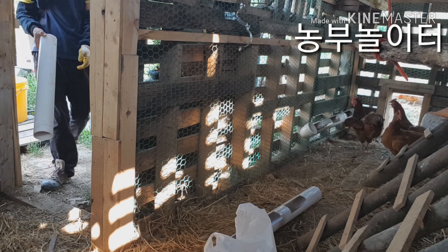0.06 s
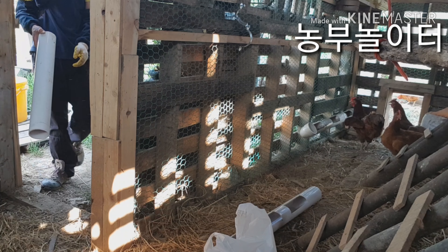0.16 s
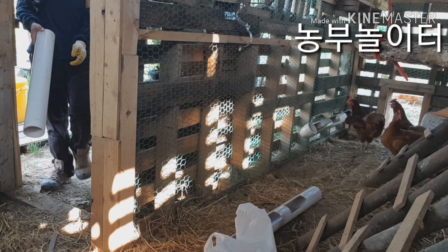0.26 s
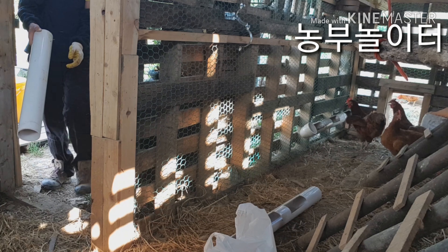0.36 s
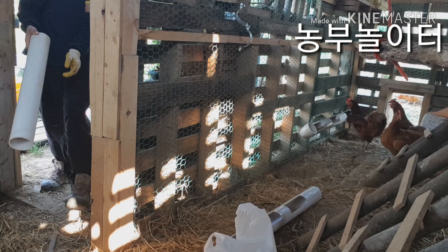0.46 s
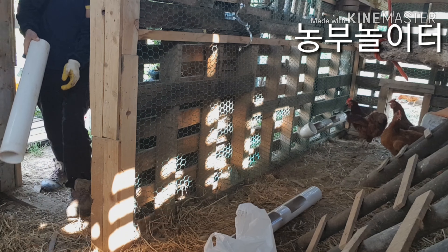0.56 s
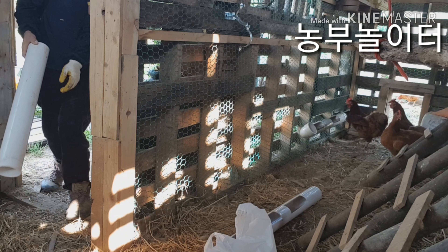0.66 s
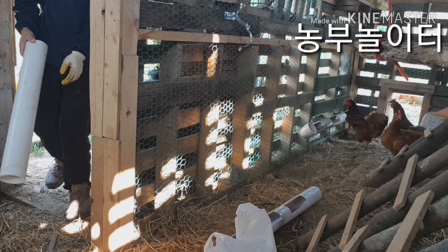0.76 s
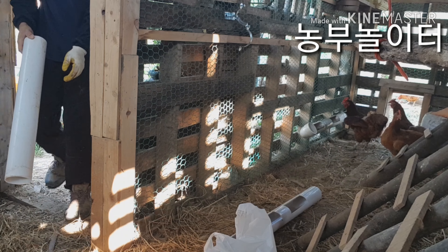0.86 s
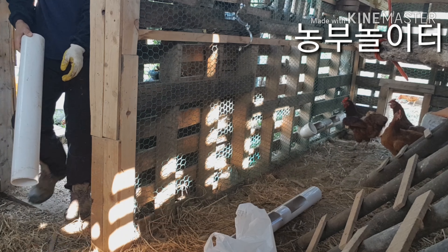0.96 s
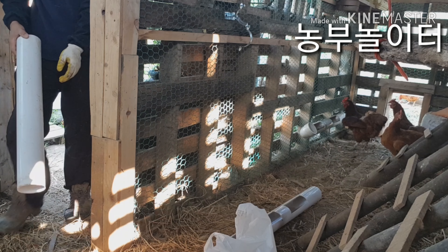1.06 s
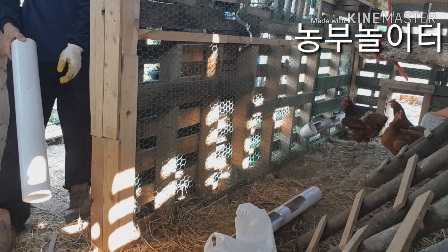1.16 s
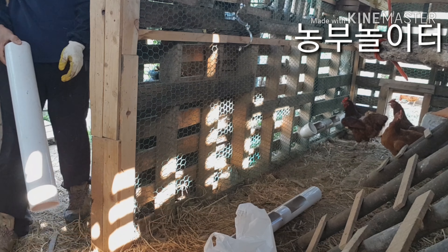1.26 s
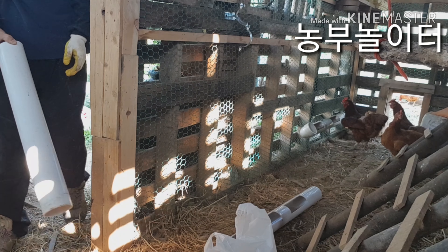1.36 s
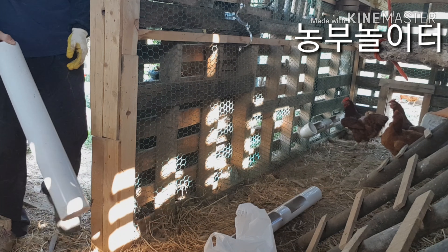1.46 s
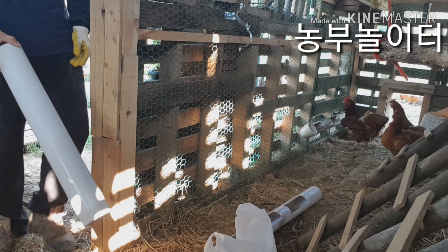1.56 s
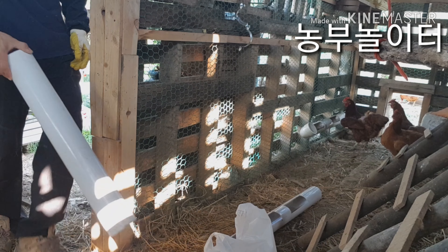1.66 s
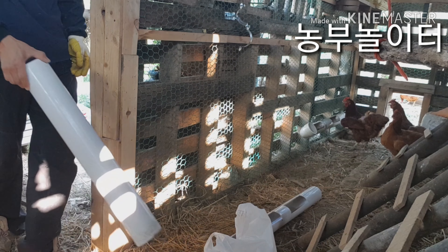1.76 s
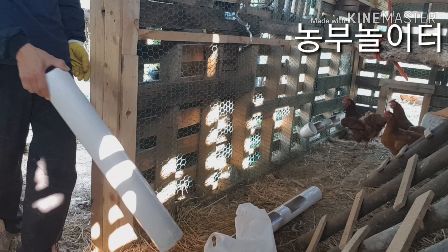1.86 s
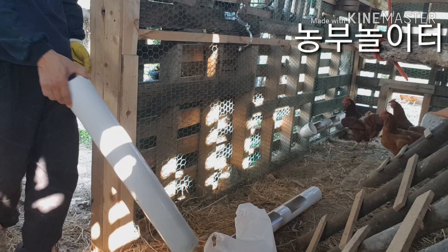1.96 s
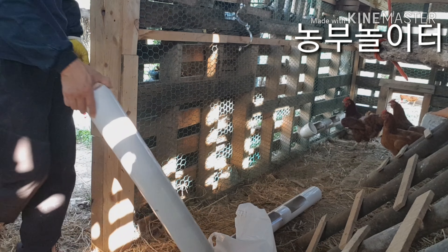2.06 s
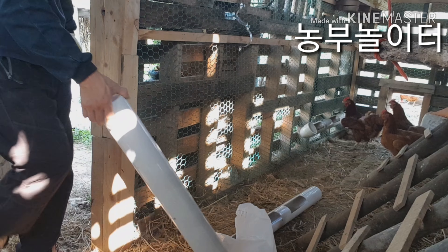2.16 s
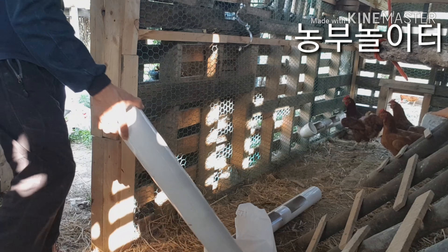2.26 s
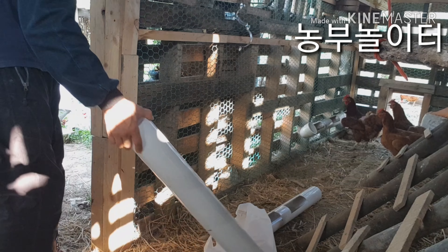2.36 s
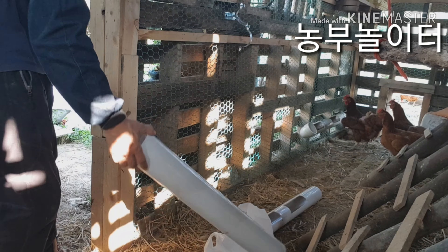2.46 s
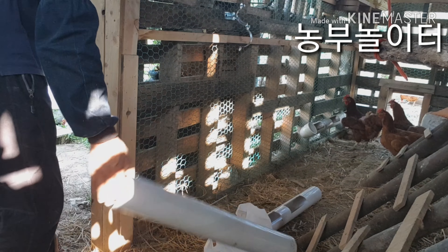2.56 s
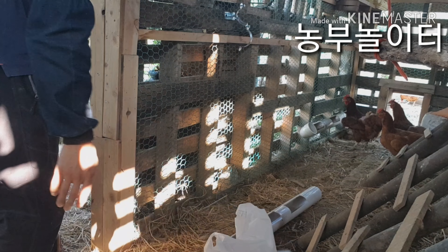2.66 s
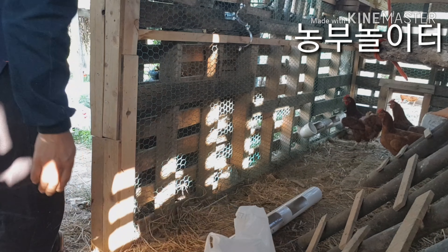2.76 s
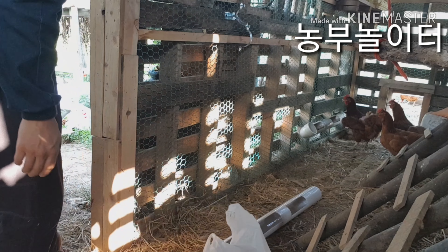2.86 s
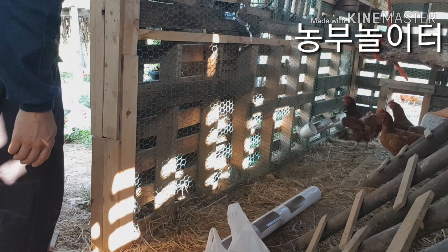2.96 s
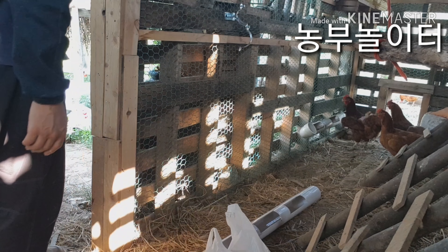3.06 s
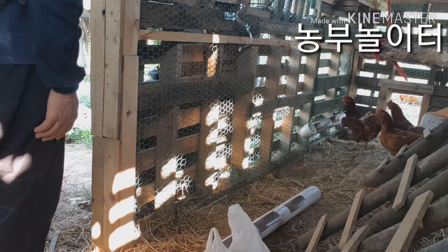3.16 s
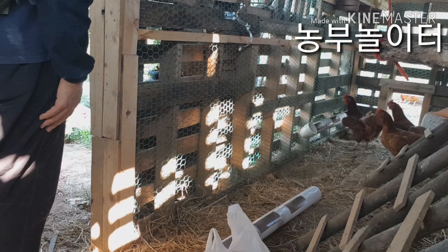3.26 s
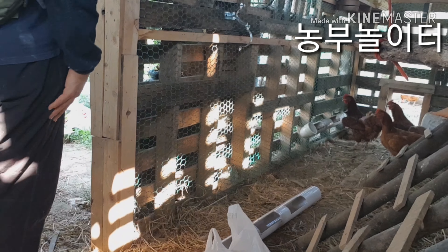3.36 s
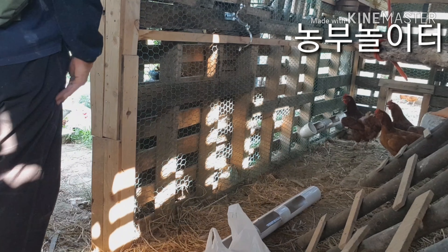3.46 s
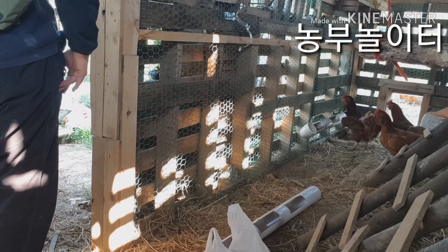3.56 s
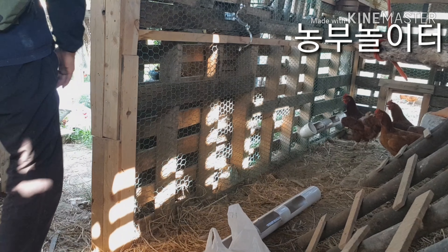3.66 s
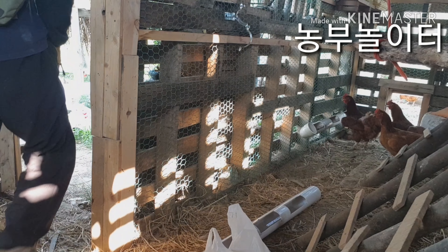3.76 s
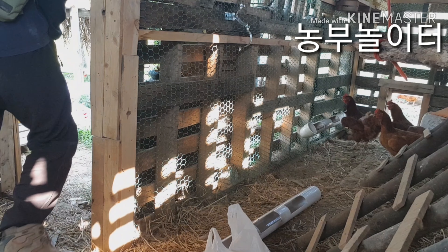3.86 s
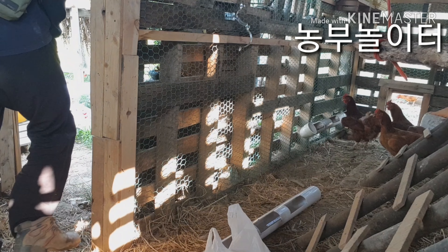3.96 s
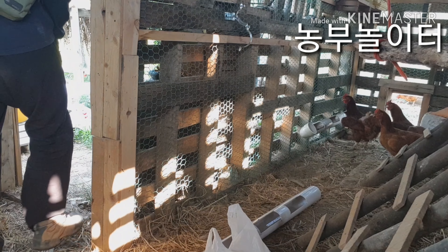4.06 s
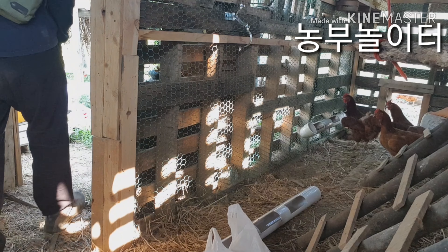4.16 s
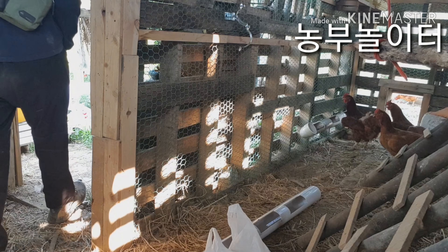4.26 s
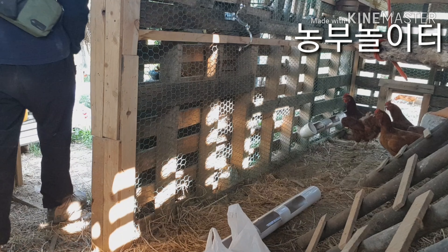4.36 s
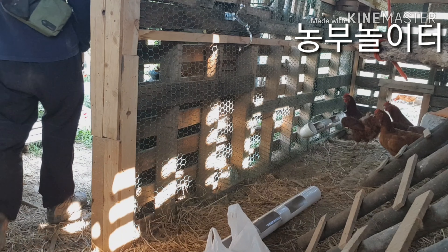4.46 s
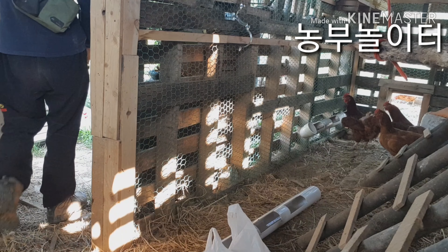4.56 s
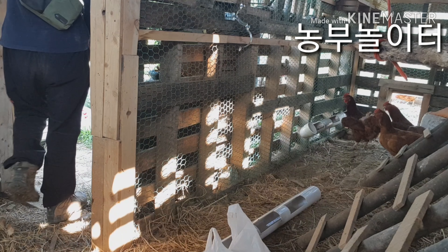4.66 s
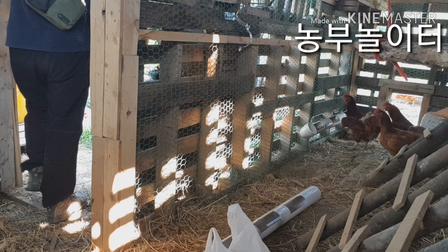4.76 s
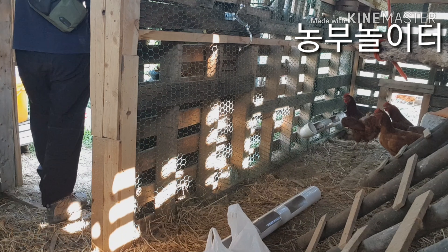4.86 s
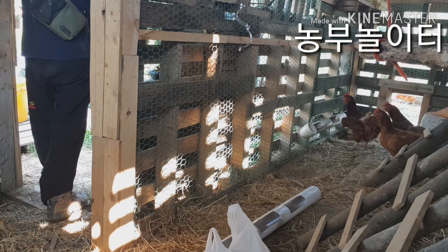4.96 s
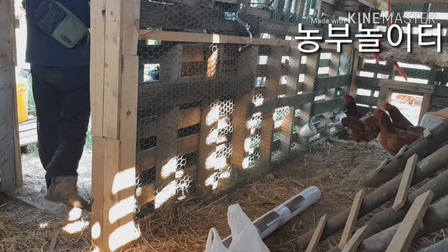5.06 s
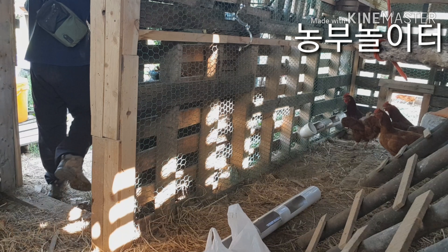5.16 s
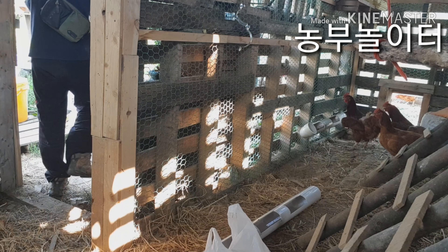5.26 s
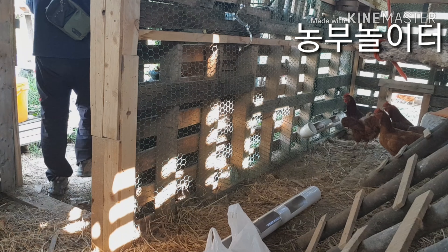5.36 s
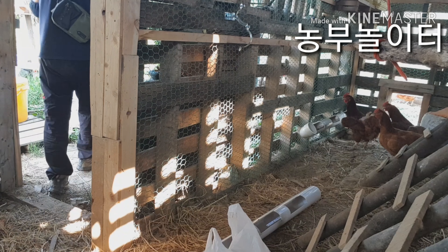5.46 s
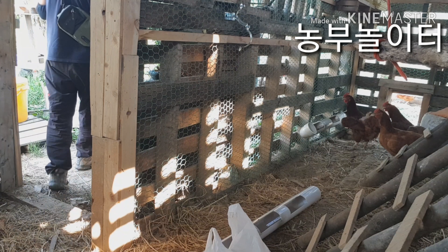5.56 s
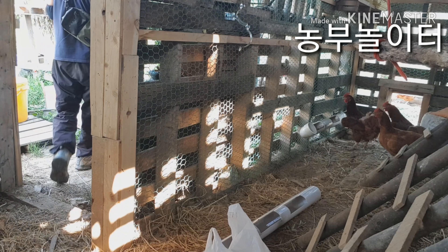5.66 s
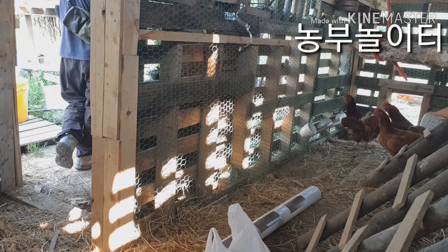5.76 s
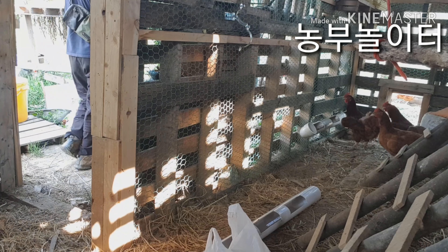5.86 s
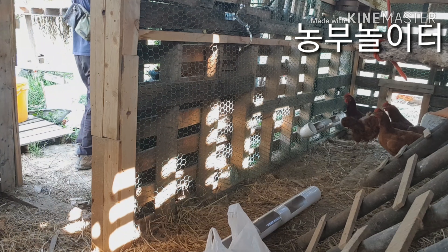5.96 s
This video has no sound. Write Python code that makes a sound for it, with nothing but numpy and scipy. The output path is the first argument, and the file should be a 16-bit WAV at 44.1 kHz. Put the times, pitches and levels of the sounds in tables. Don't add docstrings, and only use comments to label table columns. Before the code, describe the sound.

A plastic pipe drops hollowly onto straw and a crackling bag in a wooden coop, over soft rustling steps and a distant low engine hum.

```python
import sys
import numpy as np
from scipy import signal
from scipy.fft import rfft, irfft
from scipy.io import wavfile

SR = 44100
rng = np.random.default_rng(int(sys.argv[2]) if len(sys.argv) > 2 else 0)


def ratio_of_db(decibels):
    return 10 ** (np.asarray(decibels, float) / 20)


def pcm_store(signal):
    levels = np.round(np.clip(np.atleast_2d(signal), -1, 1) * 32767)
    wavfile.write(sys.argv[1], SR, levels.astype(np.int16).T)


N = 265041
LEFT_DB = 3.2
MIC_BALANCE = 10 ** (np.array([[LEFT_DB / 2], [-LEFT_DB / 2]]) / 20)


# start_s, hoop_db, wall_db, air_db
PIPE_CONTACTS = [(2.760, -42, -21, -23), (2.778, -12, -22, -31), (2.7829, -20, -15, -34.5),
                 (2.7891, -14, -15, -14.5), (2.796, -22, -19, -20.5), (2.804, -21, -20, -23),
                 (2.833, -21, -22, -30), (2.903, -19, -20, -29), (2.9072, -23, -24, -40),
                 (2.921, -44, -34, -27), (2.953, -37, -35, -44), (3.010, -48, -46, -48)]
# mode_hz, level_db, t60_s
HOOP_MODES = [(615, -12, .06), (670, -8, .08), (718, 0, .065), (760, -14, .04)]
# mode_hz, level_db, t60_s
WALL_MODES = [(925, -10, .06), (1030, -7, .045), (1140, -10, .04), (1290, -6, .045), (1470, -11, .06),
              (1550, -5, .045), (1800, -14, .03), (2040, -7, .035), (2230, -9, .03), (2460, -12, .025),
              (2700, -8, .025), (2910, -8, .025), (3250, -12, .02), (3600, -10, .02), (3900, -12, .02)]
# mode_hz, level_db, t60_s
AIR_MODES = [(90, -5, .09), (135, -14, .1), (263, -2, .26), (315, -17, .1), (418, -8, .14), (523, 0, .17)]
LANDING_HZ, BOUNCE_HZ, BOUNCE_S = 4000, 1500, 2.9


def pipe():
    out = np.zeros(N)
    for start_s, hoop_db, wall_db, air_db in PIPE_CONTACTS:
        i = round(start_s * SR)
        push_hz = LANDING_HZ if start_s < BOUNCE_S else BOUNCE_HZ
        click = np.zeros(SR // 2)
        click[0] = 1
        push = signal.sosfilt(signal.butter(2, push_hz, fs=SR, output="sos"), click)

        modes = [(hz, ratio_of_db(db + hoop_db), t60_s) for hz, db, t60_s in HOOP_MODES]
        for k, (hz, db, t60_s) in enumerate(AIR_MODES):
            modes.append((hz, (-1) ** k * ratio_of_db(db + air_db), t60_s))
        for hz, db, t60_s in WALL_MODES:
            strength, sign = rng.normal(0, 1, 2)
            modes.append((hz, np.sign(sign) * ratio_of_db(db + wall_db + 2 * strength), t60_s))

        for hz, gain, t60_s in modes:
            out[i:i + len(push)] += gain * ring(push, hz, t60_s)
    return out


# start_s, level_db, t60_s
CRUSHES = [
    (2.760, -29, 0.08516),
    (2.778, -16.5, 0.0947),
    (2.7829, -14.5, 0.02483),
    (2.7891, -12, 0.0974),
    (2.796, -17.5, 0.2413),
    (2.833, -29, 0.3073),
    (2.903, -37, 0.0633),
    (2.921, -42, 0.5069),
    (3.010, -42.5, 0.11814),
]
# freq_hz, density_db
CRUNCH_COLOUR = [(470, -30), (800, -5), (1300, -6), (1900, -6), (2200, 1), (2850, 2), (3600, 0), (6300, -3),
                 (7700, -6), (9000, -3), (12700, 0), (15700, -4)]


def crunch():
    return dying(CRUSHES) * ratio_of_db(1.6 * drift(80.0)) * diffuse(CRUNCH_COLOUR, grain_db=3.0)


COOP_T60_S, COOP_CUT_HZ, COOP_DB = 0.23395, 5200, -13


def coop(x):
    out = np.zeros((2, N))
    dull = np.exp(-2 * np.pi * COOP_CUT_HZ / SR)
    start, stop = round(2.7 * SR), round(3.7 * SR)
    lags = (rng.uniform(0.0086, 0.024, 16) * SR).astype(int)
    for k, lag in enumerate(lags):
        loop = x[start:stop].copy()
        gain, state = ratio_of_db(-60 * lag / SR / COOP_T60_S), [0.]
        for i in range(lag, len(loop), lag):
            back, state = signal.lfilter([gain * (1 - dull)], [1, -dull], loop[i - lag:i], zi=state)
            loop[i:i + lag] += back[:len(loop) - i]
        out[k % 2, start:stop] += (loop - x[start:stop]) * (-1) ** (k // 2)
    apart = signal.lfilter(*signal.butter(1, 700, "high", fs=SR), out[0] - out[1])
    return ratio_of_db(COOP_DB) * (out.sum(axis=0) + apart * [[1], [-1]]) / 2


# start_s, cloth_db, straw_db, swell_s_per_20db, fade_s_per_20db (negative: no fade,
# stays to the end)
MOVES = [(0.0, -70, -58, .02, .02), (0.3, -83.5, -65, .03, .06), (0.55, -75, -63, .01, .3),
         (0.68, -68, -71, .15, .2), (0.84, -70, -72, .1, .2), (1.181, -47, -54, .08, 0.118),
         (1.36, -64, -67, .2, .4), (1.565, -61, -67, .01, .25), (1.76, -50, -55, .03, .11),
         (1.92, -62, -66, .2, 0.5835), (2.129, -47.5, -56, 0.152, .15), (2.43, -61, -65, .2, 0.1707),
         (2.6, -65, -70.5, .1, .3), (3.3, -66, -66, .3, .4), (3.58, -63, -68.5, .12, .3),
         (3.93, -85, -72.5, .03, -0.5285), (4.24, -67, -70, .05, .15), (4.33, -64, -71.5, .1, .15),
         (4.59, -61, -72, .09, .08), (4.87, -80, -69, .04, .06), (5.1, -81.5, -73, .1, .2),
         (5.41, -88, -72, .25, 0.6761), (5.65, -80, -72, .1, -0.0278), (5.885, -66, -60, .004, .12)]
HOLD_S = .03


def swells(column):
    t, power = np.arange(N) / SR, 1e-12
    for row in MOVES:
        start_s, swell_s, fade_s = row[0], row[3], row[4]
        before = (start_s - HOLD_S / 2 - t) / swell_s
        after = (t - start_s - HOLD_S / 2) / fade_s
        away = np.maximum(np.maximum(before, after), 0)
        power = power + ratio_of_db(row[column] - 20 * away) ** 2
    return 10 * np.log10(power)


# start_s, peak_db, t60_s, left_over_right_db
STRAW_SNAPS = [(0.5494, -59, 0.02986, -15), (0.9796, -61, 0.01996, -1), (1.1294, -44.5, 0.0469, 1.5),
               (1.2495, -45, 0.0175, 2), (1.5468, -44.5, 0.03024, -0.5), (1.8917, -40.5, 0.01775, 4.5),
               (1.9893, -52.5, 0.02907, 1.5), (2.1133, -45.5, 0.0277, 1), (2.1694, -45, 0.02452, -3),
               (3.1398, -54, 0.0293, 4), (3.3276, -47.5, 0.0366, 2.5), (3.6893, -56.5, 0.03034, 4),
               (4.8194, -66.5, 0.02848, 3), (5.8732, -43, 0.05, 1.5)]
# start_s, level_db, t60_s
FOOTFALLS = [
    (.535, -43, 0.25),
    (4.815, -51.5, 0.3),
    (5.87, -61, 0.117),
]
# freq_hz, density_db
CLOTH_COLOUR = [(5000, -26), (7500, -12), (9000, -3), (11500, -0.5), (13500, -5), (15000, -3.5),
                (15700, -6)]
# freq_hz, density_db
STRAW_COLOUR = [(2000, -8), (3500, -4), (5200, -1.5), (7700, -8), (10000, -6), (15500, -23)]
# freq_hz, density_db
FOOTFALL_COLOUR = [(90, -17), (330, 2), (1000, -5.5), (2200, -10.5), (4000, -34)]
SNAP_DB, SNAP_TILT_DB = -9, 6


def walker():
    cloth = ratio_of_db(swells(column=1) + 1.5 * drift(30.0)) * diffuse(CLOTH_COLOUR, grain_db=3.0)
    grains = diffuse(STRAW_COLOUR, grain_db=2.0)
    straw = ratio_of_db(swells(column=2) + 1.5 * drift(40.956)) * grains

    snaps = 0
    for start_s, peak_db, t60_s, pan_db in STRAW_SNAPS:
        half_db = (pan_db - LEFT_DB) / 2
        snaps = snaps + dying([(start_s, peak_db + SNAP_DB, t60_s)]) * ratio_of_db([[half_db], [-half_db]])
    sharp = rms_one(grains + ratio_of_db(SNAP_TILT_DB) * np.diff(grains, prepend=0))

    boots = dying(FOOTFALLS) * diffuse(FOOTFALL_COLOUR, grain_db=1.5)
    return cloth + straw + snaps * sharp + boots


# time_s, firing_hz
FIRING = [(0.0, 23.9), (.5, 23.4), (.75, 23.35), (1.1, 23.6), (1.65, 23.68), (1.95, 23.84), (3.45, 23.9),
          (3.75, 23.7), (4.05, 23.75), (4.35, 23.88), (4.65, 23.58), (4.95, 23.48), (5.25, 23.28),
          (5.55, 23.13), (6.01, 23.2)]
# firing_multiple, level_db
ORDERS = [(1, -38), (2, -7), (3, -15), (4, -11), (5, 1), (6, -1.5), (7, -5.5), (8, -8), (9, -11.5),
          (10, -40.5)]
# freq_hz, left_over_right_db
THROB_LEFT = [(47, 2.5), (71, 5), (118, -1.796), (142, 1), (190, 0)]
# freq_hz, share
SWING_SHARE = [(47, .7), (95, .7), (118, 1.35), (142, 1.1), (190, .8), (213, .7)]
# freq_hz, density_db
RUMBLE_COLOUR = [(10, -34), (30, -19), (42, -8), (62, 1), (105, -4), (180, -4), (222, -7), (245, -17),
                 (330, -80)]
# freq_hz, density_db
ROAR_COLOUR = [(150, -47.5), (220, -15), (255, -14), (320, -17.5), (480, -14), (1300, -15), (1650, -19.5),
               (2500, -24.5), (3600, -35), (5500, -38), (8500, -45), (14000, -62)]
# freq_hz, width_hz, level_db
ROAR_BOOMS = [(390.42, 51.29, -3.5), (635.21, 110.45, -21), (1007.1, 30, -23)]
THROB_DB, RUMBLE_DB, ROAR_DB = -35.6, -12.5, -49.1
IDLE_HZ, LOAD_DB_PER_HZ = 23.7, 2.8
ECHO_S, ECHO_SHARE = .0134, .9
SMEAR = -.6
THROB_LAG_S = .00025
ROAR_FOLLOWS = 0.6458


def engine():
    time_s, speed_hz = np.transpose(FIRING)
    firing_hz = np.interp(np.arange(N) / SR, time_s, speed_hz)
    level_db = gain_dip() + LOAD_DB_PER_HZ * (IDLE_HZ - firing_hz)
    turn = 2 * np.pi * np.cumsum(firing_hz) / SR
    side = np.array([[.5], [-.5]])

    throb = 0
    for k, db in ORDERS:
        hz = k * np.mean(firing_hz)
        echo = 1 + ECHO_SHARE * np.exp(-2j * np.pi * hz * ECHO_S)
        path = SMEAR * k ** 2 + np.angle(echo)
        wobble = .15 * drift(2.0)
        lag = side * 2 * np.pi * hz * THROB_LAG_S
        swing_db = at_hz(SWING_SHARE, hz) * level_db
        gain = ratio_of_db(db + 0.19 * drift(1.4) + side * at_hz(THROB_LEFT, hz) + swing_db)
        throb = throb + gain * np.cos(k * turn + path + wobble - lag)

    follow_db = ROAR_FOLLOWS * level_db
    rumble = ratio_of_db(RUMBLE_DB + follow_db) * diffuse(RUMBLE_COLOUR, grain_db=-0.5258)
    roar = diffuse(ROAR_COLOUR, grain_db=0.1913, booms=ROAR_BOOMS)
    return ratio_of_db(THROB_DB) * (throb + rumble) + ratio_of_db(ROAR_DB + follow_db + .5 * drift(6.8)) * roar


# freq_hz, density_db
HISS_COLOUR = [(2500, -22), (4500, -9), (7000, -5), (8000, -6), (10000, 0), (12000, -2), (14000, -5),
               (15600, -7)]
HISS_DB, HISS_FOLLOWS = -72.5, .75


def hiss():
    return ratio_of_db(HISS_DB + HISS_FOLLOWS * gain_dip()) * diffuse(HISS_COLOUR, grain_db=-1.0) * MIC_BALANCE


BLOW_S, DIP_DB, DIP_FALL_S, RECOVER_S, RECOVER_SPAN_S = 2.7692, -8, .17, 5.35, .3


def gain_dip():
    t = np.arange(N) / SR
    fall = 1 - np.exp(-np.maximum(t - BLOW_S, 0) / DIP_FALL_S)
    return DIP_DB * fall / (1 + np.exp((t - RECOVER_S) / RECOVER_SPAN_S))


def ring(push, hz, t60_s):
    r, w = ratio_of_db(-60 / (t60_s * SR)), 2 * np.pi * hz / SR
    return signal.lfilter([0, np.sin(w)], [1, -2 * r * np.cos(w), r * r], push + 1e-18)


def dying(rows):
    power, t = np.zeros(N), np.arange(N) / SR
    for start_s, db, t60_s in rows:
        i = round(start_s * SR)
        after = t[:min(N - i, SR)]
        attack = np.minimum(after / 0.00045, 1)
        power[i:i + len(after)] += ratio_of_db(db - 60 * after / t60_s) ** 2 * attack
    return np.sqrt(power)


# freq_hz, correlation
LIKENESS = [(60, 0.9684), (110, 1), (200, 0.478), (380, 0.8723), (700, 0.3177), (1290, -0.3275),
            (2380, 0.2595), (4400, 0.0485), (8120, -0.08), (15000, 0.0)]


def diffuse(spectrum, grain_db, booms=()):
    grains = rng.standard_normal((2, N)) * ratio_of_db(grain_db * rng.exponential(1, (2, N)))
    hz = np.maximum(np.fft.rfftfreq(N, 1 / SR), 1)
    colour = ratio_of_db(at_hz(spectrum, hz))
    for boom_hz, width_hz, boom_db in booms:
        colour = colour * (1 + ratio_of_db(boom_db + 13) / (1 + (2 * (hz - boom_hz) / width_hz) ** 2))
    alike = np.clip(at_hz(LIKENESS, hz), -1, 1)
    mid, side = rfft(grains) * colour
    return rms_one(irfft(np.sqrt(1 + alike) * mid + np.sqrt(1 - alike) * side * [[1], [-1]], N))


def drift(rate_hz):
    r = np.exp(-2 * np.pi * rate_hz * 40 / SR)
    slow = signal.lfilter([1], [1, -2 * r, r * r], rng.standard_normal(N // 40 + 2002))[2000:]
    return np.interp(np.arange(N) / 40, np.arange(len(slow)), rms_one(slow))


def at_hz(points, hz):
    freq_hz, value = np.transpose(points)
    return np.interp(np.log(hz), np.log(np.maximum(freq_hz, 1)), value)


def rms_one(x):
    return x / np.sqrt(np.mean(x ** 2) + 1e-20)


PIPE_LEFT_DB, PIPE_LAG_S = 3.6, .00016


def scene():
    knock = pipe()
    late = np.interp(np.arange(N) - PIPE_LAG_S * SR, np.arange(N), knock)
    direct = np.array([knock * ratio_of_db(PIPE_LEFT_DB - LEFT_DB), late])
    return (direct + coop(knock) + crunch() + walker() + engine()) * MIC_BALANCE


def band_limit(x):
    return signal.sosfilt(signal.butter(12, 15980, fs=SR, output="sos"), x)


def record(dry):
    mix = dry + hiss()
    mix = signal.sosfilt(signal.butter(2, 30, "high", fs=SR, output="sos"), mix)
    mix = np.tanh(mix)
    mix = signal.sosfilt(signal.ellip(10, .5, 60, 15480, fs=SR, output="sos"), mix)
    return band_limit(mix)


dry = scene()
out = record(dry)
pcm_store(out)
```